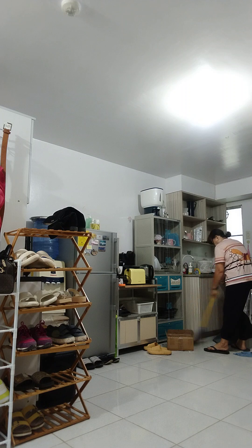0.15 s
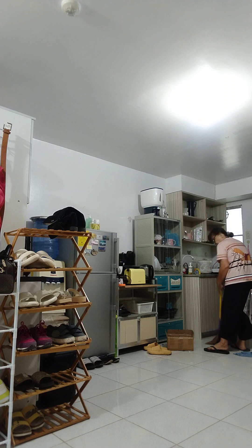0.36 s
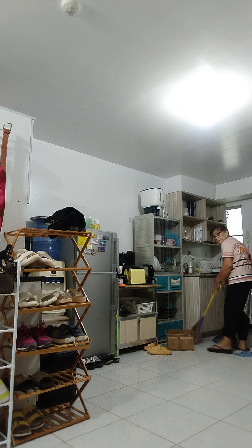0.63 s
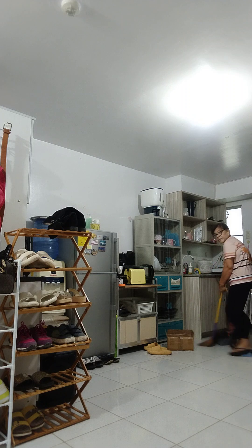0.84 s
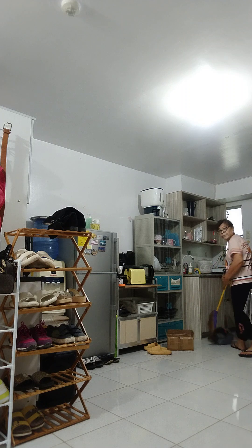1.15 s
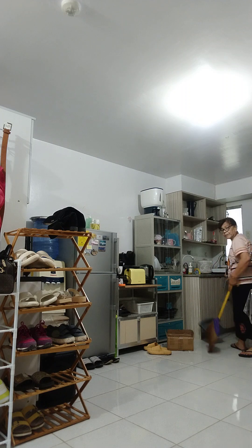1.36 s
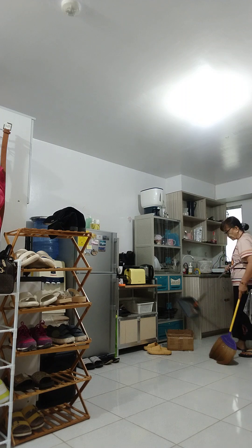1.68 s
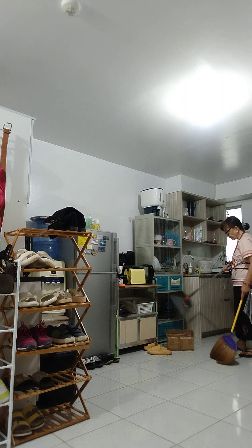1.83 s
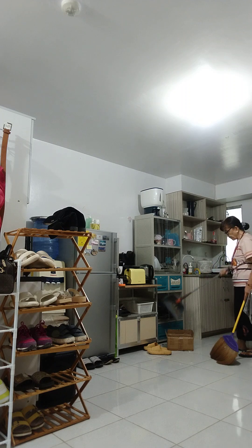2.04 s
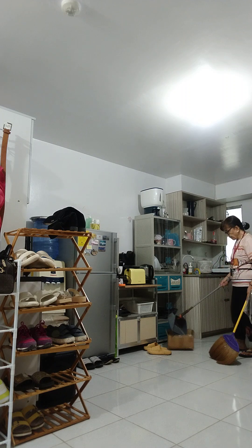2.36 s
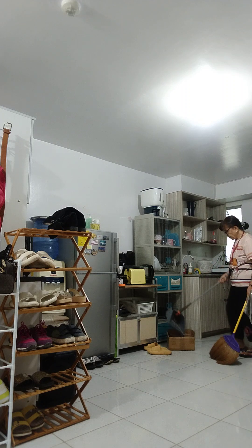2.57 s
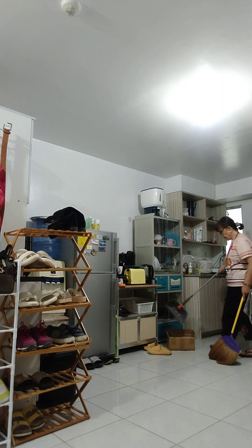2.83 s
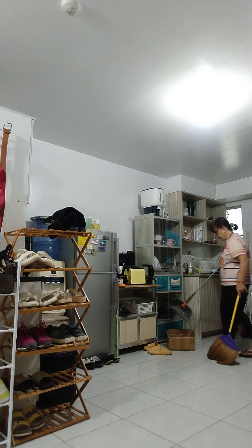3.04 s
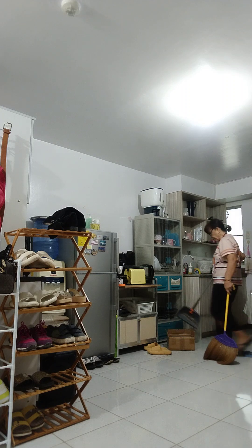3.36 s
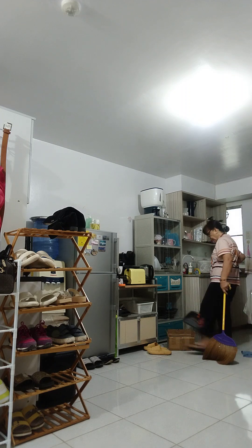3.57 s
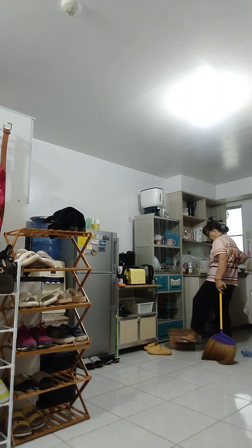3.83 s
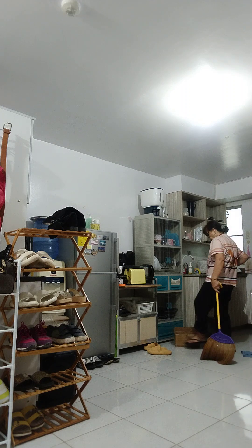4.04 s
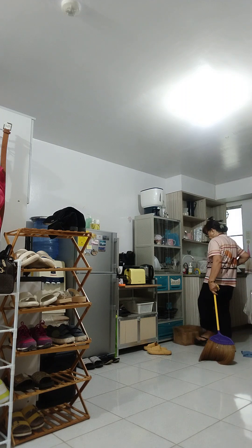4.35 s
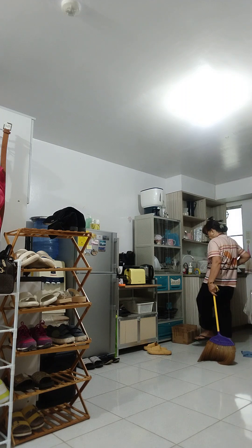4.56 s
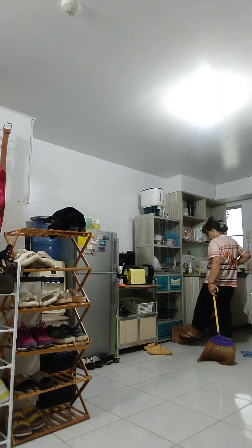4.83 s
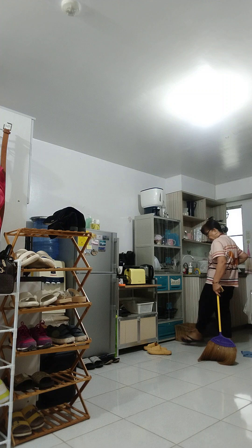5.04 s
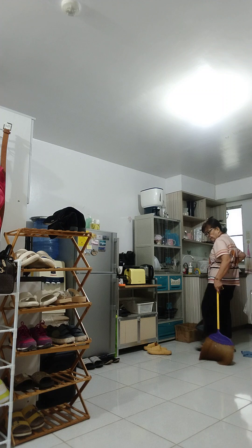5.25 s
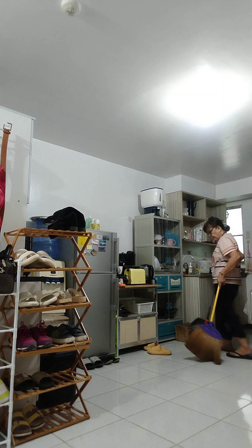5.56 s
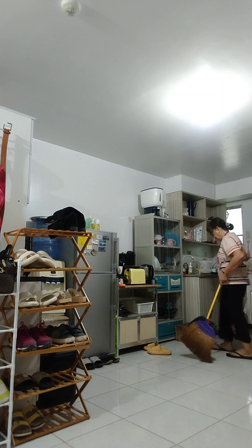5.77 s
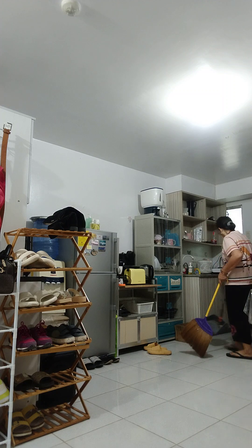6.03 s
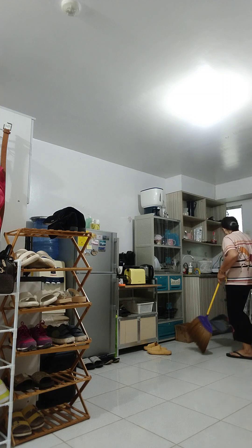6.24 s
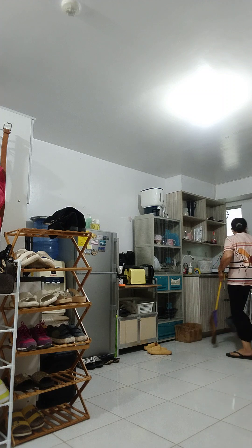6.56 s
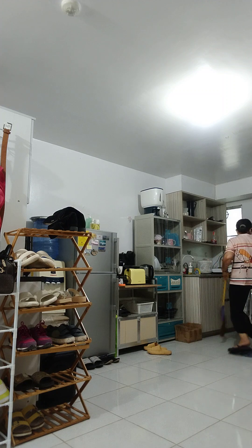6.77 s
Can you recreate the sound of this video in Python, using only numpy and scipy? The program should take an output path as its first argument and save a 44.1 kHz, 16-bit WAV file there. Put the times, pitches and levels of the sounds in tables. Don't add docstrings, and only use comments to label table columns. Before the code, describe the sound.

In a hard-walled kitchen, brisk bristle swishes, plastic raps, dull basket knocks and one loud wooden strike sound over fridge hum and street noise.

```python
import sys
import numpy as np
from scipy import signal
from scipy.fft import rfft, irfft, next_fast_len
from scipy.io import wavfile
from scipy.ndimage import uniform_filter1d, map_coordinates

SR = 44100
rng = np.random.default_rng(int(sys.argv[2]) if len(sys.argv) > 2 else 0)


def amplitude_ratio(level_db):
    exponent = np.asarray(level_db, float) / 20
    return 10 ** exponent


def inscribe(sig):
    pcm = np.round(np.clip(np.atleast_2d(sig).T, -1, 1) * 32767)
    wavfile.write(sys.argv[1], SR, pcm.astype(np.int16))


N = 304290


def unit(x):
    return x / np.sqrt(np.mean(x ** 2) + 1e-20)


def along(points, hz):
    f, value = np.transpose(points)
    return np.interp(np.log(hz + 1), np.log(f + 1), value)


def wobble(rate_hz):
    knots = rng.standard_normal(int(N * rate_hz / SR) + 4)
    return map_coordinates(knots, [np.arange(N) * rate_hz / SR])


def filtered(x, response):
    m = next_fast_len(len(x) + 8192)
    return irfft(rfft(x, m) * response(np.fft.rfftfreq(m, 1 / SR)), m)[:len(x)]


def coloured(x, spectrum):
    return filtered(x, lambda hz: amplitude_ratio(along(spectrum, hz)))


def onset(t, rise_s):
    return 1 - np.exp(-t / rise_s)


def decay(t, t60_s):
    return amplitude_ratio(-60 * t / t60_s)


def rush(spectrum, patchy_db, grain_db=0):
    slips = rng.standard_normal(N) * amplitude_ratio(grain_db * wobble(400))
    z = signal.stft(slips, nperseg=512)[2]
    field = uniform_filter1d(rng.standard_normal(z.shape), 5, 0)
    field = uniform_filter1d(field, 6, 1)
    patched = signal.istft(z * amplitude_ratio(patchy_db * unit(field)), nperseg=512)[1][:N]
    return unit(coloured(patched, spectrum))


def pushes(rows, sag_db_per_s, lift_db_per_s, offset_db=lambda row, age: 0):
    rise_power = 1.07
    t, power = np.arange(0, N, 48) / SR, 1e-12
    for row in rows:
        s, db, rise_s, hold_s = row[:4]
        rise_s, hold_s = max(rise_s, .002), max(hold_s, 0)
        age = np.clip(t - s, 0, None)
        sag_db = sag_db_per_s * np.clip(age - rise_s, 0, hold_s)
        lift_db = lift_db_per_s * np.clip(age - rise_s - hold_s, 0, None)
        touch = np.minimum(age / rise_s, 1) ** rise_power
        power = power + (touch * amplitude_ratio(db - sag_db - lift_db + offset_db(row, age))) ** 2
    return np.interp(np.arange(N) / SR, t, np.sqrt(power))


# (delay [s], level [dB])
WALLS = [(.0049, 0), (.0108, -6), (.0163, -6), (.025, -12), (.0322, -9), (.0352, -8)]
# (frequency [Hz], t60 [s])
TAIL = [(250, 0.35), (1200, 0.41), (3500, 0.3), (9000, 0.32)]


def kitchen(x, wet_db, walls_db):
    hz, t, z = signal.stft(rng.standard_normal(SR // 2), SR, nperseg=256)
    tail = signal.istft(z * decay(t, along(TAIL, hz)[:, None]), SR, nperseg=256)[1]
    build_up = onset(np.arange(len(tail)) / SR, 0.0022)
    answer = amplitude_ratio(wet_db) * tail * build_up / np.linalg.norm(tail)

    def direct_and_walls(f):
        total = 1.5
        for delay_s, db in WALLS:
            echo = amplitude_ratio(db + walls_db) * np.exp(-2j * np.pi * f * delay_s)
            total = total + echo / (1 + 1j * f * delay_s / 60)
        return total

    walls = filtered(signal.unit_impulse(len(tail)), direct_and_walls)
    return signal.fftconvolve(x, answer + walls)


def place(blows, wet_db, walls_db):
    out = np.zeros(N + SR)
    for s, sound in blows:
        heard = kitchen(sound, wet_db, walls_db)
        out[round(s * SR):][:len(heard)] += heard
    return out[:N]


# (time [s], level [dB])
AIR = [(0.0, -42.5), (0.3, -42), (0.6, -44.5), (0.86, -41.5), (1.09, -42), (1.27, -41.5), (2.15, -39.5),
       (2.6, -40.5), (2.8, -44), (3.5, -41), (4.0, -40.5), (4.28, -44.5), (4.5, -42), (5.2, -43),
       (5.65, -43.5), (5.9, -46), (6.32, -45), (6.9, -44.5)]
# (frequency [Hz], level [dB per Hz])
DRONE = [(18, -45), (30, -15.5), (102, -4.5), (225, -1), (335, -1), (504, -15.5), (700, -16), (910, -22.5),
         (1540, -120)]
# (frequency [Hz], width [Hz], level [dB])
HUM = [(59, 15, 6.5), (110, 2.7, 10), (182.3, 16.5, 2), (233.5, 19, 3), (275.4, 9.6, 2.5), (338.2, 25, 2.5),
       (415, 10, 9), (559, 16, -20)]
# (frequency [Hz], level [dB per Hz])
STREET = [(260, -48), (450, -4), (506, -7.5), (541, 0.5), (579, -7.5), (690, -6), (847, -11.5), (1130, -10),
          (1560, -16), (1920, -14), (2310, -17), (3500, -18.5), (4600, -27.5), (5980, -57), (10100, -120)]
# (frequency [Hz], level [dB per Hz])
SHUFFLE = [(2060, -18), (3500, -4.5), (4260, -16.5), (4830, -8.5), (5220, -4.5), (5700, -9), (6780, -7),
           (7640, -10), (8610, -5.5), (9350, -9.5), (10500, -17), (13600, -42), (22000, -120)]
# (touch [s], level [dB], rise [s], hold [s])
BRUSHES = [(0.03, -54, 0.11, .05), (0.27, -46, 0.036, .02), (0.42, -51, 0.15, 0.06),
           (0.9, -55.5, 0.22, 0.062), (1.4, -61.5, .1, 0.046), (2.55, -49, 0.035, .01),
           (3.3, -56.5, 0.16, 0.12), (4.02, -36.5, 0.15, 0.16), (4.5, -46, 0.14, .12),
           (5.05, -48, 0.1, 0.045), (5.22, -45, 0.039, 0.015), (6.8, -58, .06, .05)]


def background():
    street_mean_db, street_follows = -50.5, 0.84
    hush_db, hush_sinks_db_per_s = -57, 1.02
    t = np.arange(N) / SR
    drone_db = np.interp(t, *np.transpose(AIR), -45, -45)
    modes = lambda f: 1 + sum(amplitude_ratio(db) / (1 + (2 * (f - c) / w) ** 2) for c, w, db in HUM)
    drone = unit(filtered(rush(DRONE, patchy_db=0.9), modes)) * amplitude_ratio(.7 * wobble(9))
    street_db = street_mean_db + street_follows * (drone_db - drone_db.mean())
    street = amplitude_ratio(street_db) * rush(STREET, patchy_db=1.1)
    brushes = pushes(BRUSHES, sag_db_per_s=25, lift_db_per_s=127)
    shuffle_gain = np.hypot(amplitude_ratio(hush_db - hush_sinks_db_per_s * t), brushes)
    return amplitude_ratio(drone_db) * drone + street + shuffle_gain * rush(SHUFFLE, patchy_db=0.5)


# (touch [s], hiss [dB], rise [s], hold [s], grit re hiss [dB])
DRAGS = [(0.042, -49, .015, 0.037, -5), (0.105, -29.5, 0.048, 0.022, -8.5), (0.235, -31, 0.0033, 0.11, -4),
         (0.305, -32.5, 0.03, .02, -6.5), (2.432, -31.5, 0.011, 0.018, -8),
         (2.44, -28.5, 0.026, 0.051, -17), (2.531, -28.5, 0.003, 0.025, -2), (2.605, -29, .042, 0.022, -5),
         (4.399, -33.5, 0.009, .01, -2), (4.42, -38, 0.05, 0.17, -3.5), (4.57, -39.5, 0.077, .07, -7),
         (4.745, -41.5, 0.039, 0.0054, 5), (4.986, -35.5, 0.0066, 0.018, -9),
         (4.995, -28.5, 0.024, 0.025, -1), (5.07, -34, 0.041, 0.099, -5), (5.23, -43.5, .04, 0.038, -3.5),
         (0.97, -55.5, 0.031, .05, 4.5), (1.06, -54.5, 0.056, .1, 3.5), (4.595, -51.5, 0.0073, 0.011, 7.5),
         (5.678, -56.5, .014, .04, 9.5), (6.84, -55.5, 0.029, .05, 1.5)]
# (touch [s], hiss [dB], rise [s], hold [s], grit re hiss [dB])
SLIDE = [
    (3.964, -39, 0.015, 0.054, -6),
    (3.982, -33.5, 0.047, .1, -2.5),
    (4.115, -42, 0.073, 0.05, 2),
    (4.191, -42, 0.064, 0.068, 1),
]
# (frequency [Hz], level [dB per Hz])
HISS = [(1470, -44), (2500, -10), (2690, -7), (2920, -7), (3670, -4.5), (4090, -7.5), (5260, -2.5),
        (8610, -6.5), (9190, -6.5), (10500, -16), (13600, -39), (22000, -120)]
# (frequency [Hz], level [dB per Hz])
GRIT = [(900, -53), (1600, -19.5), (2100, -4), (3200, -5), (3900, -12), (4800, -21.5)]
# (frequency [Hz], level [dB per Hz])
RUB = [(80, -5), (300, -1.5), (700, 0.5), (1200, -3), (1800, -1), (2500, -42)]


def drags():
    rub_db, rub_per_weight, rub_fades_db_per_s = 0.5, 1, 33
    wicker_rub_db, wicker_fades_db_per_s = -7.5, 38
    pressure = dict(sag_db_per_s=53.5, lift_db_per_s=166)
    landing = lambda row, age: rub_db + rub_per_weight * row[-1] - rub_fades_db_per_s * age
    wicker = lambda row, age: wicker_rub_db - wicker_fades_db_per_s * age
    weight = lambda row, age: row[-1]

    flutter = amplitude_ratio(.35 * wobble(30))
    hiss = pushes(DRAGS + SLIDE, **pressure) * rush(HISS, patchy_db=1.1, grain_db=0.94)
    grit = pushes(DRAGS + SLIDE, **pressure, offset_db=weight) * rush(GRIT, patchy_db=2.2, grain_db=1.8)
    broom_body = pushes(DRAGS, **pressure, offset_db=landing)
    basket_body = pushes(SLIDE, **pressure, offset_db=wicker)
    rub = np.hypot(broom_body, basket_body) * amplitude_ratio(1.97 * wobble(25.37)) * rush(RUB, patchy_db=4.0)
    return flutter * (hiss + grit + rub)


def plastic(rows):
    t, blows = np.arange(SR // 8) / SR, []
    for s, db, hz, t60_s, bright_db, sharp in rows:
        def body(f):
            resonance = 1 / (1 + (sharp * (f / hz - hz / (f + 1))) ** 2)
            return resonance + amplitude_ratio(bright_db - 1.5 + along(HISS, f))

        rattle = unit(filtered(rng.standard_normal(len(t)), body))
        envelope = decay(t, max(t60_s, .005)) * onset(t, 0.00039)
        blows.append((s, amplitude_ratio(db - 13.5) * rattle * envelope))
    return place(blows, wet_db=5.5, walls_db=-7)


# (time [s], peak [dB], centre [Hz], brightness [dB], sharpness [Q])
RAPS = [(0.1303, -14, 5350, -21, 3.7), (0.522, -28.5, 1360, -14, 0.76), (1.02, -37, 1180, -16, 1.2),
        (1.488, -37.5, 902, -5, 1.5), (2.54, -13, 2250, -9, 4), (3.196, -35, 1940, -27, 0.74),
        (3.541, -28, 2820, -2, 1.2), (3.879, -30.5, 2160, -14, 2.2), (4.629, -41, 2860, -17, 2.1),
        (5.231, -24, 2350, -20, 2.9), (5.27, -36, 1560, -22, 2), (4.405, -20.5, 1450, -27, 1.4),
        (6.736, -36, 1980, -7, 2.1), (6.858, -34, 2970, -3, 0.73)]


def raps():
    rattle_t60_s = 0.037
    return plastic([(s, db, hz, rattle_t60_s, bright_db, sharp) for s, db, hz, bright_db, sharp in RAPS])


# (time [s], peak [dB], pitch [Hz], t60 [s], slap re peak [dB])
THUDS = [
    (0.237, -33, 258, 0.057, 8),
    (0.323, -21.5, 320, 0.023, -25),
    (2.46, -24, 322, 0.015, -8),
    (2.536, -19.5, 502, 0.049, 3),
    (2.609, -29, 580, 0.012, -6),
    (3.967, -20, 413, 0.044, -13),
    (4.401, -19, 460, 0.11, -15),
    (5.053, -16, 334, 0.01, -20),
    (4.402, -26, 279, 0.067, -20),
]


def thuds():
    t, blows = np.arange(SR // 8) / SR, []
    for s, db, hz, t60_s, slap_db in THUDS:
        modes_hz = hz * np.array([[.88], [1], [1.14]])
        ring = amplitude_ratio([-3, 0, -4]) @ np.sin(2 * np.pi * modes_hz * t) * decay(t, max(t60_s, .002))
        slap = coloured(rng.standard_normal(len(t)), GRIT) * amplitude_ratio(slap_db - 10.5) * decay(t, 0.046)
        blows.append((s, amplitude_ratio(db - 10.5) * (ring * onset(t, 0.00078) + slap)))
    return place(blows, wet_db=10.0, walls_db=4.0)


# (time [s], peak [dB], centre [Hz], t60 [s], brightness [dB])
SLAPS = [
    (0.238, -16.5, 1330, 0.048, -14),
    (4.761, -27, 1900, 0.052, -21),
    (4.779, -22, 1460, 0.076, -30),
    (5.016, -8.5, 1800, 0.051, -25),
    (5.032, -7, 1790, 0.014, -17.5),
    (5.869, -35, 1290, 0.026, -37),
]


def slaps():
    sharpness = 0.88
    return plastic([(*row, sharpness) for row in SLAPS])


# (time [s], peak [dB], pitch [Hz], t60 [s])
HEELS = [(0.279, -23.5, 56, 0.22), (0.674, -36, 109, 0.49), (1.095, -37, 108.5, 0.53),
         (1.3, -29, 112.5, 0.16), (1.941, -29.5, 112, 0.29), (2.44, -35, 110, 0.29),
         (2.551, -34, 128.5, 0.23), (3.971, -32.5, 111, 0.23), (4.403, -23, 113, 0.13),
         (5.037, -22.5, 129, 0.14), (5.088, -28.5, 101.4, 0.34), (5.4, -57, 94.2, 0.3),
         (5.656, -32.5, 109, 0.16)]


def heels():
    out, t = np.zeros(N + SR), np.arange(SR // 2) / SR
    for s, db, hz, t60_s in HEELS:
        boom = amplitude_ratio(db) * decay(t, max(t60_s, .05)) * np.sin(2 * np.pi * hz * t)
        out[round(s * SR):][:len(t)] += boom * onset(t, 0.014)
    return out[:N]


# (time [s], peak [dB])
HANDLE = [
    (5.7349, -3),
]
# (frequency [Hz], level [dB per Hz])
WOOD = [(210, -45), (520, -22.5), (800, -8), (1250, -3), (1700, -8), (2200, -12), (2600, -20.5),
        (3400, -14), (4200, -55), (5500, -30.5), (7000, -28), (8500, -28), (10500, -43), (22000, -120)]
# (frequency [Hz], level [dB], t60 [s])
STICK = [(950, -12, .025), (1330, -7, .011), (1660, -12, .018), (3400, -19, .008)]


def handle():
    colour = amplitude_ratio(along(WOOD, np.fft.rfftfreq(4096, 1 / SR)))
    cepstrum = irfft(np.log(colour + 1e-5))
    causal = np.r_[1, 2 * np.ones(2047), 1, np.zeros(2047)]
    blow = irfft(np.exp(rfft(cepstrum * causal)))
    t = np.arange(len(blow)) / SR
    ring = sum(amplitude_ratio(db) * decay(t, t60_s) * np.sin(2 * np.pi * hz * t) for hz, db, t60_s in STICK)
    contact = amplitude_ratio(0.5) * blow / np.abs(blow).max() * onset(t, 0.000095)
    sound = contact + ring * onset(t, 0.001)
    return place([(s, -amplitude_ratio(db - 5.0) * sound) for s, db in HANDLE], wet_db=9.0, walls_db=6.0)


def scene():
    return (background() + drags() + raps() + thuds() + slaps() + heels() + handle())[None]


def top_cut(x):
    return signal.sosfilt(signal.butter(12, 15480, fs=SR, output="sos"), x)


# (frequency [Hz], level [dB])
EDGE = [(9000, -1), (10000, -9), (10600, -10), (10900, -51)]


def record(dry):
    kept = filtered(dry[0], lambda hz: amplitude_ratio(along(EDGE, hz)) * hz ** 4 / (hz ** 4 + 36 ** 4))
    flipped = kept * (-1) ** np.arange(N)
    mirror = filtered(flipped, lambda hz: (hz > 12800) * (hz < 15500))
    mix = (kept + amplitude_ratio(-38.5) * mirror)[None]
    return top_cut(mix)


dry = scene()
out = record(dry)
inscribe(out)
```